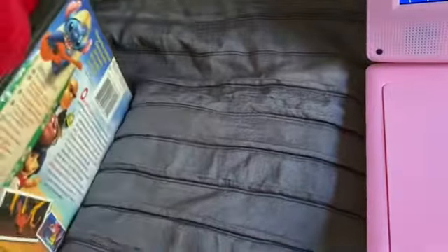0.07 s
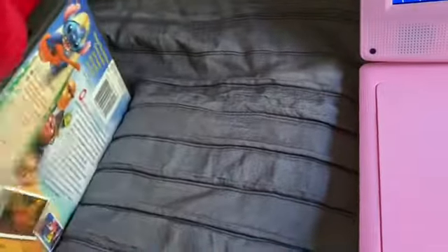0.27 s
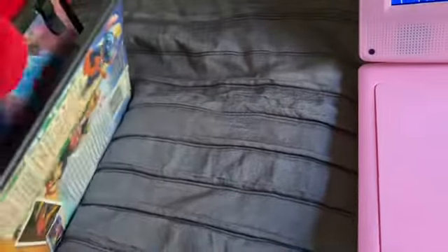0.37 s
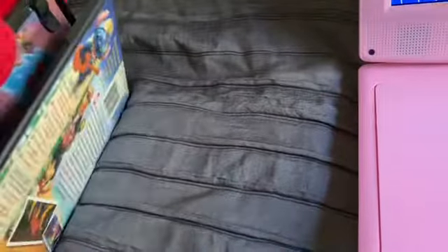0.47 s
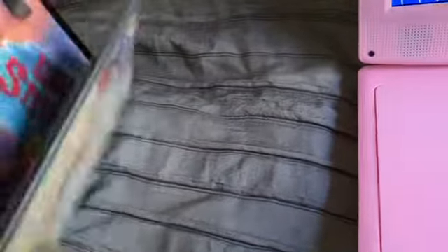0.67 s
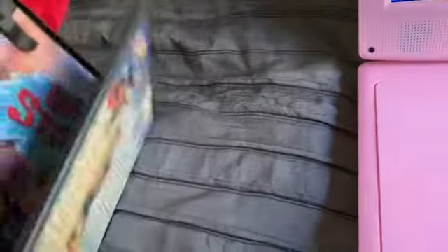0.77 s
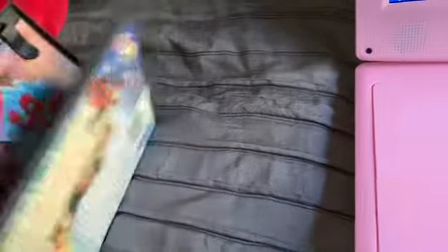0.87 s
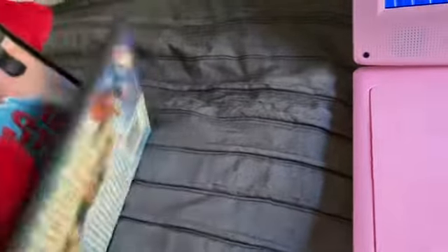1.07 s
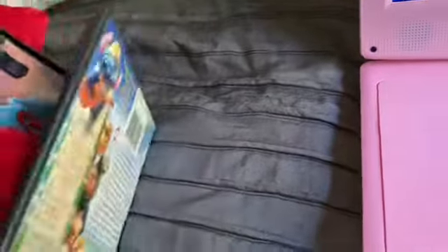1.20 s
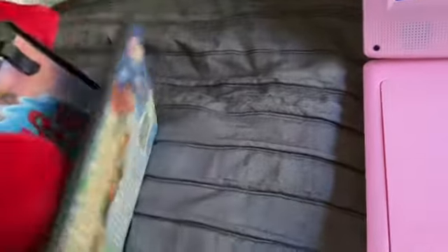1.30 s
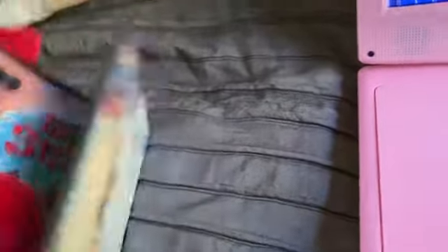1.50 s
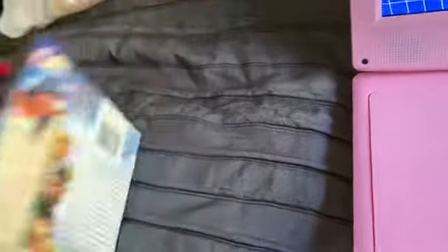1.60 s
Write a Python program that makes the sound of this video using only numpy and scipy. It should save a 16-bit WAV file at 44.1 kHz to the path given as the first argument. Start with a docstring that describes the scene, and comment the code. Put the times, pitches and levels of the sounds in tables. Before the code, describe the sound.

A plastic disc case pops open with a sharp, loud double snap and brief chatter, then a short creak, light clicks, knocks and faint rattles as it is handled; close microphone, small quiet room.

```python
"""A plastic disc case is prised open in a small room.
Shaped noise makes a low room hum and a faint hiss of sliding, heard from the start.
Two catches snap with noise cracks and damped lid tones; a soft thump and a burst of chatter follow.
Then damped tones knock, clicks ring the shell and disc, and the spine creaks in a slowing train of slips.
Clicks, knocks and faint rattles carry on to the end, with two dull scuffs of the fingers."""
import sys
import numpy as np
from scipy import signal
from scipy.fft import rfft, irfft, next_fast_len
from scipy.io import wavfile

SR = 44100
rng = np.random.default_rng(int(sys.argv[2]) if len(sys.argv) > 2 else 0)


def unload_audio(sound):
    """Save the sound as a 16-bit wav file, at the path given as the first command line argument."""
    columns = np.transpose(np.atleast_2d(sound))
    # keep every value between -1 and 1, then stretch to whole-number steps
    steps = np.round(np.clip(columns, -1, 1) * 32767)
    wavfile.write(sys.argv[1], SR, steps.astype(np.int16))


N = 72765  # length [samples]
CRACK_RISE_S, RING_SCATTER_DB = 0.00025, 2  # attack of cracks and rings; spread of mode levels


def amp(db):
    """Decibels to gain."""
    return 10 ** (np.asarray(db) / 20)


def unit(x):
    """Scale to rms 1."""
    return x / np.sqrt(np.mean(x ** 2) + 1e-20)


def along(points, hz):
    """Read (frequency, value) points on a log frequency axis."""
    point_hz, values = np.transpose(points)
    return np.interp(np.log(hz + 1), np.log(point_hz + 1), values)


def add(out, start_s, x):
    """Mix x into out from start_s on."""
    i = max(0, round(start_s * SR))
    out[i:i + len(x)] += x[:max(0, N - i)]


def noise(spectrum, size, tilt=0):
    """Random-phase noise of rms 1 with the given spectrum, tilted in dB per octave."""
    hz = np.fft.rfftfreq(size, 1 / SR)
    gain = amp(along(spectrum, hz) + tilt * np.log2(hz + 20))
    phases = np.exp(2j * np.pi * rng.random(len(hz)))
    return unit(irfft(gain * phases, size))


def fade(rise_s, t60):
    """Quick attack and exponential decay (60 dB in t60 seconds), half a second long."""
    t = np.arange(SR // 2) / SR
    return (1 - np.exp(-t / rise_s)) * 1000 ** (-t / t60)


def tone(hz, rise_s, t60, turn=0):
    """One damped vibration, starting at a given fraction of a cycle."""
    t = np.arange(SR // 2) / SR
    return np.sin(2 * np.pi * (hz * t + turn)) * fade(rise_s, t60)


def crack(spectrum, t60, tilt=0):
    """The dense, quickly damped vibration of a plastic contact, as fading noise."""
    shape = fade(CRACK_RISE_S, t60)
    burst = noise(spectrum, SR // 2, tilt) * shape
    return burst * np.linalg.norm(shape) / np.linalg.norm(burst)  # same energy on every draw


def ring(modes, tilt=0):
    """Sum of damped modes (Hz, dB, t60 s), excited a little differently each time."""
    centre = np.median([mode[0] for mode in modes])
    out = np.zeros(SR // 2)
    for hz, db, t60 in modes:
        level = db + tilt * np.log2(hz / centre) + RING_SCATTER_DB * rng.normal()
        out += amp(level) * tone(hz, CRACK_RISE_S, t60, rng.random())
    return out


# colour of the room hum: (frequency [Hz], relative level [dB per Hz])
HUM_SPECTRUM = [(25, -50.5), (56, -1.5), (195, -5.5), (240, -12), (3000, -28.5), (8000, -25.5),
                (15000, -41)]
HUM_DB = -62


def hum():
    """Steady low-heavy noise of the room."""
    return amp(HUM_DB) * noise(HUM_SPECTRUM, N)


# colour of the friction: (frequency [Hz], relative level [dB per Hz])
SLIDE_SPECTRUM = [(30, -29), (300, 0), (9500, 0), (13000, -26.5)]
# plastic sliding under the hand: (time [s], level [dB])
SLIDE_LEVELS = [(0, -76.5), (.3, -70.5), (.64, -77), (0.709, -60), (0.871, -70), (0.999, -64.5),
                (1.19, -64), (1.25, -75), (1.411, -69), (1.45, -60.5), (1.53, -58.5), (1.65, -62)]


def sliding():
    """Soft friction hiss of the moving case: noise riding a level curve."""
    level = np.interp(np.arange(N) / SR, *np.transpose(SLIDE_LEVELS))
    return amp(level) * noise(SLIDE_SPECTRUM, N)


# the catches letting go: (time [s], crack level [dB])
CATCHES = [(.2380, -11), (.2457, -10)]
# colour of a catch's crack: (frequency [Hz], relative level [dB per Hz])
CATCH_SPECTRUM = [(30, -58.5), (200, -13.5), (480, -7), (700, -8), (1000, 0), (2000, -4.5), (4200, -6.5),
                  (7200, -9.5), (10000, -17), (13000, -35.5), (16000, -52.5)]
# what the catches kick in the stressed lid:
# (frequency [Hz], t60 [s], level from the first catch [dB], level from the second [dB])
LID_MODES = [(545, 0.014, -21.5, -5.5), (668, 0.022, -14, -14.5), (804, 0.025, -12.5, -24),
             (1053, 0.015, -21, 4), (1580, 0.014, -1, -8), (2143, 0.033, -15.5, -22),
             (2985, 0.023, -24.5, -11), (7280, 0.0082, -5.5, -22)]
LID_LAG_S, LID_RISE_S, CATCH_T60_S = 0.00055, 0.001, 0.021
CATCH_RING_DB = -17  # disc ring relative to the last crack


def snap():
    """Each catch cracks and kicks the lid's damped modes; the last one jolts the disc."""
    out = np.zeros(N)
    for k, (s, db) in enumerate(CATCHES):
        add(out, s, amp(db) * crack(CATCH_SPECTRUM, CATCH_T60_S))
        for hz, t60, *levels in LID_MODES:
            add(out, s + LID_LAG_S, amp(levels[k]) * tone(hz, LID_RISE_S, t60))
    last_s, last_db = CATCHES[-1]
    add(out, last_s, amp(last_db + CATCH_RING_DB) * disc())
    return out


# the disc ringing on after a jolt: (frequency [Hz], relative level [dB])
DISC_MODES = [(1043, -4), (1128, 0), (1195, 2.5), (1300, -3), (1565, -10), (1946, -4.5), (2147, 0.5),
              (2885, -2), (3100, -1.5), (3860, -11.5), (4833, 1), (5497, -9.5)]
DISC_LOWEST_T60_S, DISC_DAMPING_POWER = 0.2, 0.28


def disc():
    """The lasting ring of the disc on its hub; higher modes die sooner."""
    modes = []
    for hz, db in DISC_MODES:
        t60 = DISC_LOWEST_T60_S * (hz / DISC_MODES[0][0]) ** -DISC_DAMPING_POWER
        modes.append((hz, db, t60))
    return ring(modes)


# decay of the room: (frequency [Hz], t60 [s])
ROOM_DECAY = [(100, 0.22), (1100, 0.47), (3000, 0.37), (12000, 0.29)]
ROOM_BUILD_S = 0.028


def room():
    """Impulse response of a small room: noise that swells in, then decays, the middle lasting longest."""
    hz, t, z = signal.stft(rng.standard_normal(SR // 2), SR, nperseg=256)
    decay = 1000 ** (-t / along(ROOM_DECAY, hz)[:, None])
    tail = signal.istft(z * decay, SR, nperseg=256)[1]
    build = 1 - np.exp(-(np.arange(len(tail)) / SR / ROOM_BUILD_S) ** 2)
    tail = tail * build
    return tail / np.linalg.norm(tail)


# soft thumps of the swinging lid: (time [s], level [dB], pitch [Hz])
THUMPS = [(0.2504, -20, 92.7), (.928, -37, 84)]
THUMP_T60_S, THUMP_RISE_S = 0.071, 0.003


def thumps():
    """The swinging lid thumps as a soft-edged, low damped tone."""
    out = np.zeros(N)
    for s, db, hz in THUMPS:
        add(out, s, amp(db) * tone(hz, THUMP_RISE_S, THUMP_T60_S))
    return out


# lid and disc chatter, a burst after the snap, then faint rattles: (time [s], level [dB])
CHATTER = [(0.253, -16), (0.2568, -15.5), (0.2615, -16.5), (0.2645, -19.5), (0.2722, -21), (0.275, -24),
           (0.2789, -21.5), (0.2853, -22.5), (.292, -22.5), (0.303, -29), (.313, -29), (0.3177, -30.5),
           (0.3754, -49), (.401, -44), (0.619, -42.5), (0.6307, -47), (.986, -47.5), (1.024, -52.5),
           (1.082, -49.5), (1.0979, -54), (1.13, -48.5), (1.149, -54), (1.3955, -53.5), (1.524, -47.5),
           (1.629, -49)]
CHATTER_T60_S, CHATTER_SHELL_DB = 0.031, -9.5
FLEX_SCATTER = 0.04  # spread of the log pitch ratio


def chatter():
    """Loose parts tap the shell, each time at a slightly different pitch."""
    out = np.zeros(N)
    for s, db in CHATTER:
        body = shell(CHATTER_T60_S, np.exp(FLEX_SCATTER * rng.normal()))
        tap = crack(CATCH_SPECTRUM, CATCH_T60_S)
        add(out, s, amp(db) * (tap + amp(CHATTER_SHELL_DB) * body))
    return out


# the heavily damped plastic shell, before flexing: (frequency [Hz], relative level [dB])
SHELL_MODES = [(1000, -2), (1300, -4), (1750, -5.5), (1980, -1.5), (2090, -1), (2250, -4), (2520, -6),
               (2900, -6.5), (3320, -3.5), (3850, -2), (4010, -2.5), (4760, -9), (5620, -11.5)]


def shell(t60, pitch, tilt=0):
    """The shell's ring: the grip sets its damping, flexing shifts its pitch."""
    return ring([(hz * pitch, db, t60) for hz, db in SHELL_MODES], tilt)


# knocks that set one patch of the shell ringing: (time [s], level [dB], pitch [Hz], t60 [s])
KNOCKS = [(0.611, -38, 1240, 0.058), (.612, -40, 3350, 0.03), (0.925, -26.5, 400, 0.0075),
          (.946, -41.5, 4580, .03), (1.428, -46.5, 3040, 0.03), (1.5756, -34.5, 535, 0.012),
          (1.602, -43.5, 995, 0.12)]
KNOCK_RISE_S = 0.00028


def knocks():
    """Each knock rings one patch of the shell as a single damped tone."""
    out = np.zeros(N)
    for s, db, hz, t60 in KNOCKS:
        add(out, s, amp(db) * tone(hz, KNOCK_RISE_S, t60))
    return out


# clicks of the handled case:
# (time [s], level [dB], t60 [s], tilt [dB per octave], pitch of the flexed shell [ratio])
CLICKS = [(.6117, -42, 0.042, -0.5, 1), (.675, -46.5, .037, 0.5, 0.89), (.8064, -37.5, 0.011, -0.5, 0.98),
          (0.911, -32.5, 0.043, -1, 1), (0.9222, -28, 0.0145, 0.5, 0.98), (.946, -37, 0.034, 1.5, 0.75),
          (1.0877, -35, 0.045, -1, 0.98), (1.1092, -36, .034, -1, 1), (1.346, -45.5, 0.0071, -3.5, 0.86),
          (1.3593, -50, 0.043, -1, 0.93), (1.426, -47.5, 0.026, 5.5, 0.9), (1.483, -51.5, 0.039, -7.5, 1),
          (1.599, -42.5, .04, -0.5, 1), (1.6136, -42.5, 0.046, -4.5, 0.98)]
# colour of a click's crack, before its tilt: (frequency [Hz], relative level [dB per Hz])
CLICK_SPECTRUM = [(30, -50), (130, -6.5), (330, -2), (650, -9.5), (2100, -4.5), (5500, -9.5), (8000, -11),
                  (15000, -38)]
CLICK_CRACK_DB, SHELL_DB, CLICK_RING_DB = -3.5, -5, -29  # contact, shell and disc within a click


def clicks():
    """Each click is a contact crack, the shell's short ring and a trace of the disc."""
    out = np.zeros(N)
    for s, db, t60, tilt, pitch in CLICKS:
        contact = amp(CLICK_CRACK_DB) * crack(CLICK_SPECTRUM, t60, tilt)
        body = amp(SHELL_DB) * shell(t60, pitch, tilt)
        jolt = amp(CLICK_RING_DB) * disc()
        add(out, s, amp(db) * (contact + body + jolt))
    return out


# the creaking spine: (time [s], rate [slips per second], level [dB])
CREAK = [(.663, 422, -40), (.685, 287, -45.5), (.703, 220, -41.5), (0.727, 103, -43.5), (0.746, 39, -50.5),
         (0.796, 33, -46.5)]
# colour of one slip: (frequency [Hz], relative level [dB per Hz])
SLIP_SPECTRUM = [(100, -27), (330, 12), (680, -12), (1050, 10), (1750, -1), (2600, -20), (16000, -39)]
SLIP_T60_S, SLIP_SCATTER_S, SLIP_SCATTER_DB = 0.012, 0.00026, 1.5


def spine():
    """Stick and slip: short cracks whose rate slows as the lid swings."""
    out = np.zeros(N)
    times, rates, levels = np.transpose(CREAK)
    t = np.arange(N) / SR
    slips = np.cumsum(np.interp(t, times, rates, left=0, right=0)) / SR
    slip_times = t[1:][np.diff(np.ceil(slips)) > 0]  # one slip per whole count
    for s in slip_times:
        db = np.interp(s, times, levels) + SLIP_SCATTER_DB * rng.normal()
        add(out, s + SLIP_SCATTER_S * rng.normal(), amp(db) * crack(SLIP_SPECTRUM, SLIP_T60_S))
    return out


# dull scuffs of the fingers on the case: (time [s], level [dB])
SCUFFS = [(1.051, -54.5), (1.428, -47)]
# colour of a scuff: (frequency [Hz], relative level [dB per Hz])
SCUFF_SPECTRUM = [(150, -29), (380, 3), (850, -4.5), (5000, -72)]
SCUFF_T60_S = 0.07


def scuffs():
    """Fingers brush the case in dull, fading bursts of noise."""
    out = np.zeros(N)
    for s, db in SCUFFS:
        add(out, s, amp(db) * crack(SCUFF_SPECTRUM, SCUFF_T60_S))
    return out


SNAP_ROOM_DB, ROOM_DB = -20.5, -18  # room sends of the opening and of the handling


def scene():
    """The case close by, its room echo, the sliding hiss and the steady hum."""
    background = hum() + sliding()
    opening = snap() + chatter()
    handled = thumps() + knocks() + clicks() + spine() + scuffs()
    send = amp(SNAP_ROOM_DB) * opening + amp(ROOM_DB) * handled
    echo = signal.fftconvolve(send, room())[:N]
    return (opening + handled + echo + background)[None]


LOW_CUT_HZ, TOP_HZ, FULL_SCALE = 45, 15900, 0.92


def record(dry):
    """Cut the deep bass, round the highest peaks and drop everything above the band limit."""
    low_cut = signal.butter(2, LOW_CUT_HZ, "high", fs=SR, output="sos")
    x = signal.sosfilt(low_cut, dry)
    x = x / (1 + (x / FULL_SCALE) ** 8) ** (1 / 8)
    size = next_fast_len(N + SR // 2)
    in_band = np.fft.rfftfreq(size, 1 / SR) < TOP_HZ
    return irfft(rfft(x, size) * in_band, size)[:, :N]


dry = scene()
out = record(dry)
unload_audio(out)
```